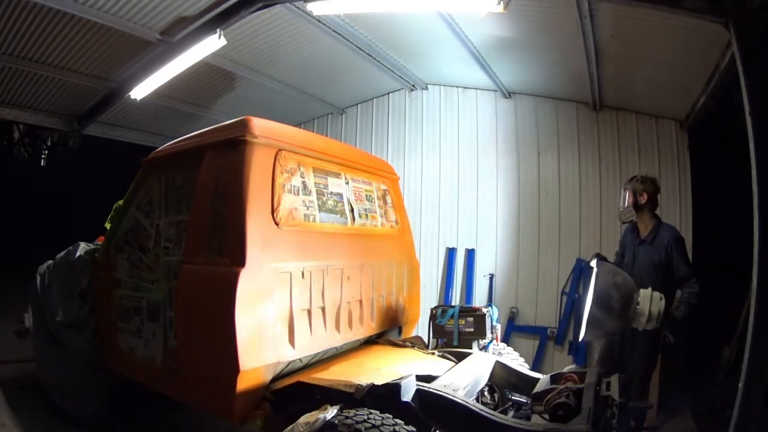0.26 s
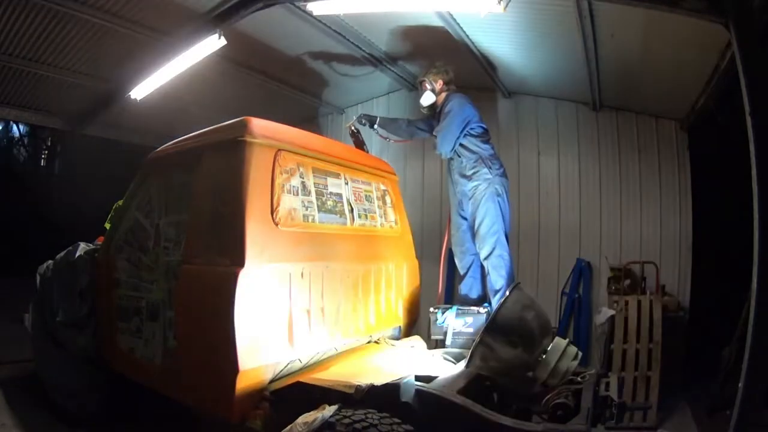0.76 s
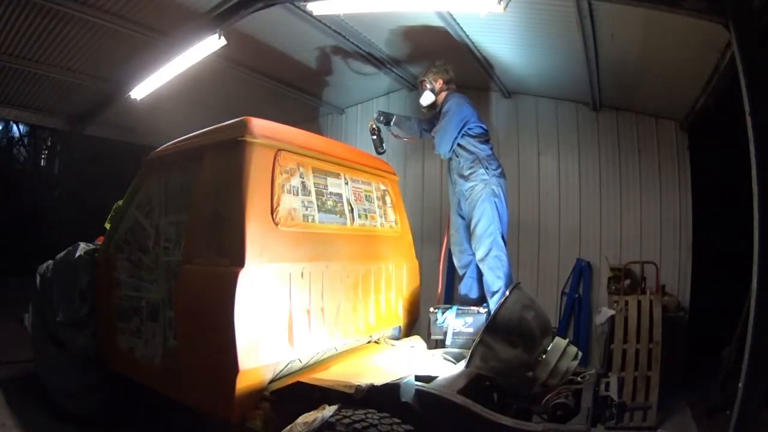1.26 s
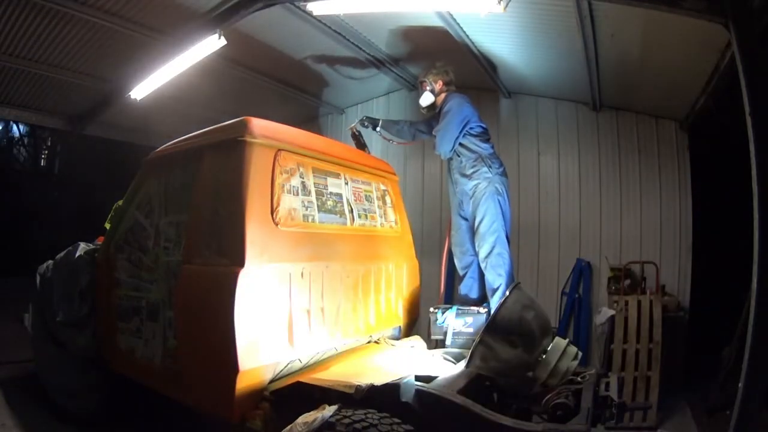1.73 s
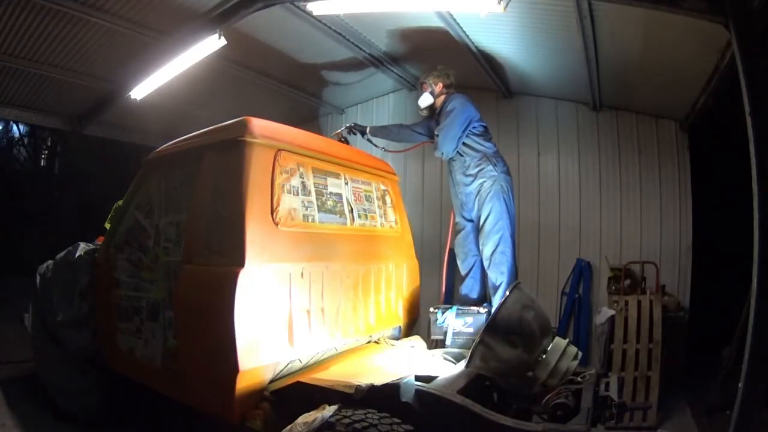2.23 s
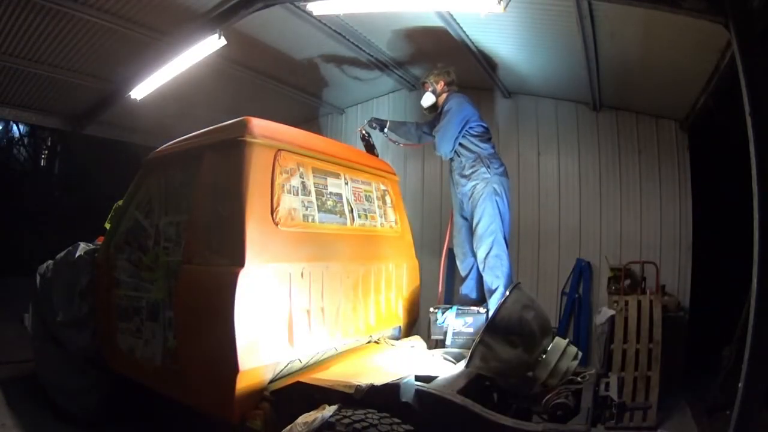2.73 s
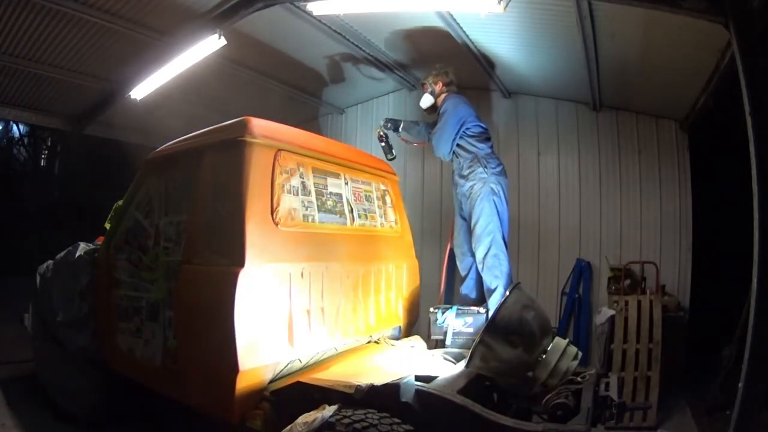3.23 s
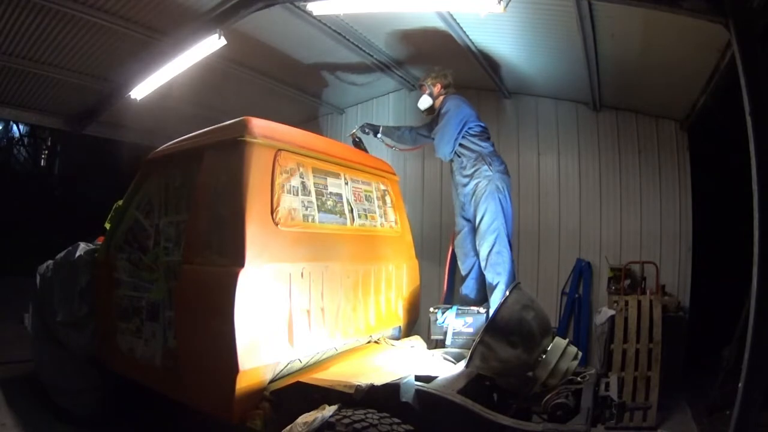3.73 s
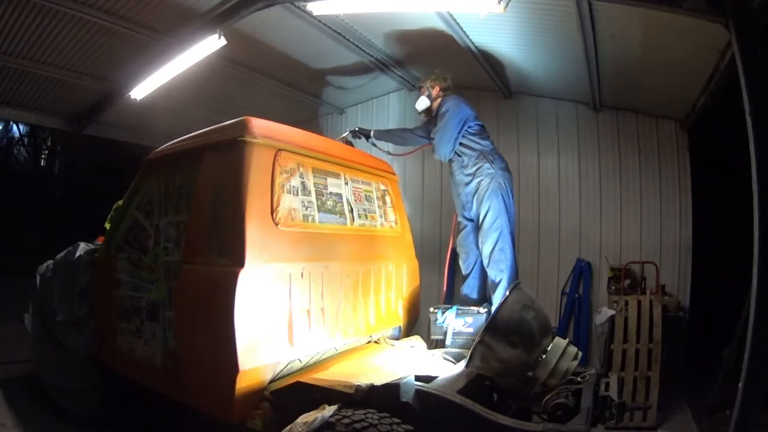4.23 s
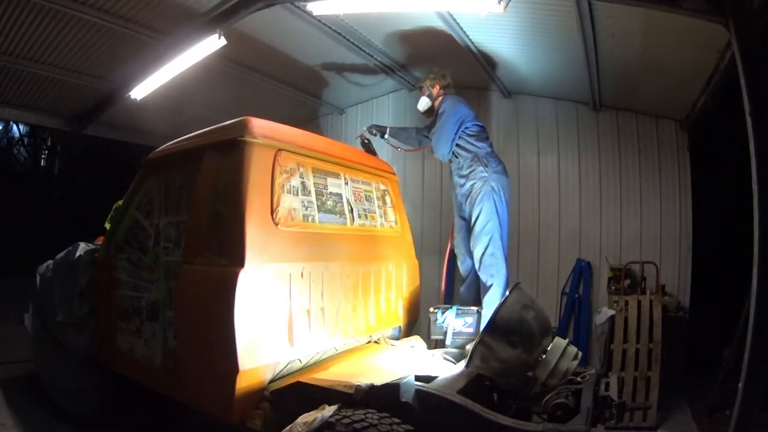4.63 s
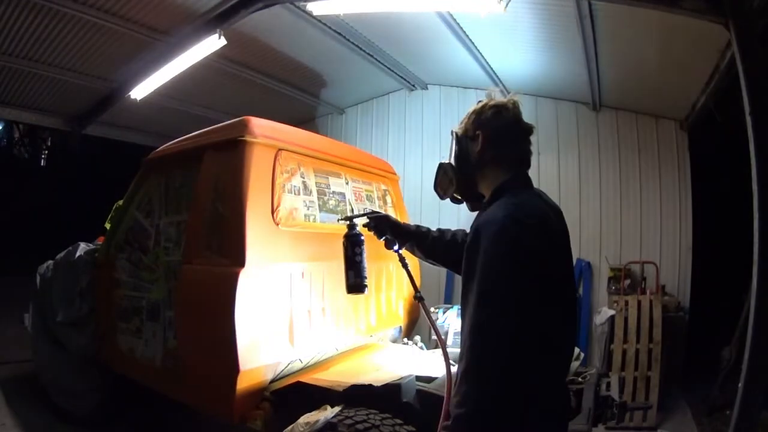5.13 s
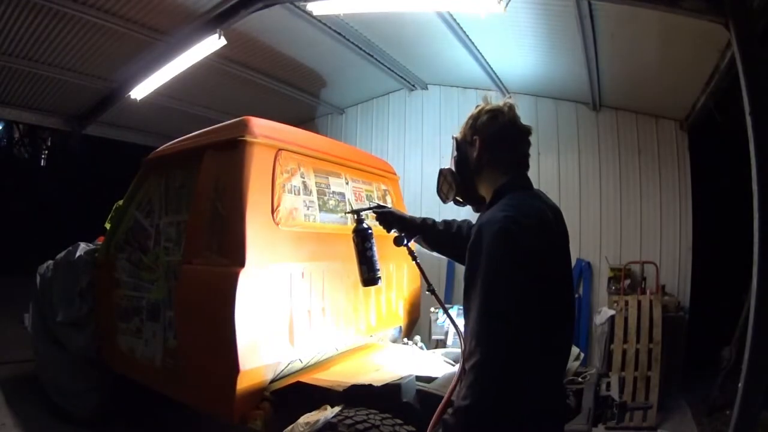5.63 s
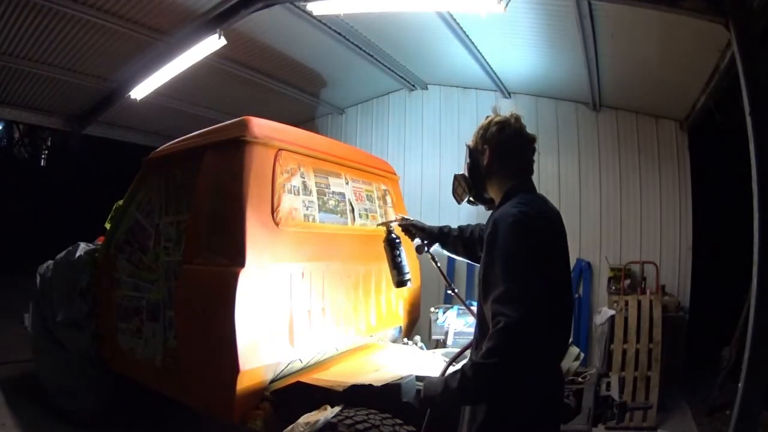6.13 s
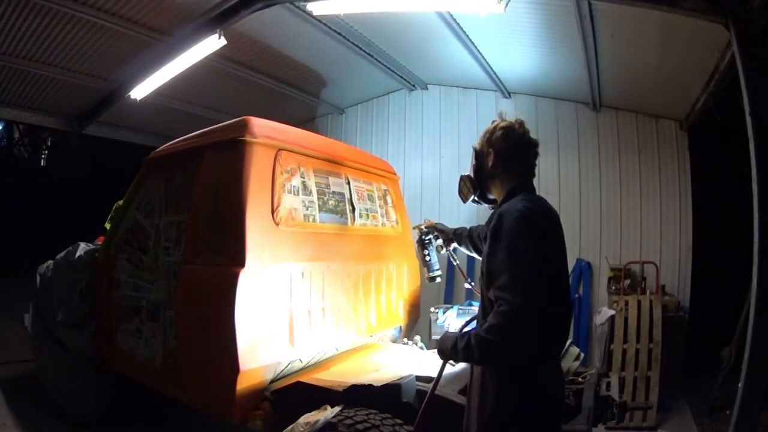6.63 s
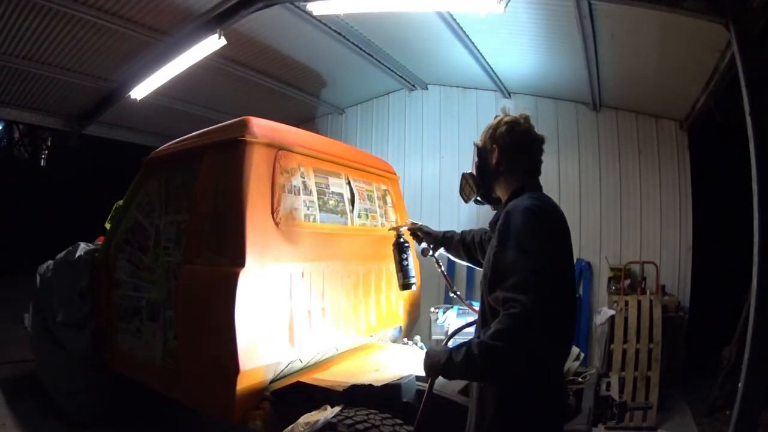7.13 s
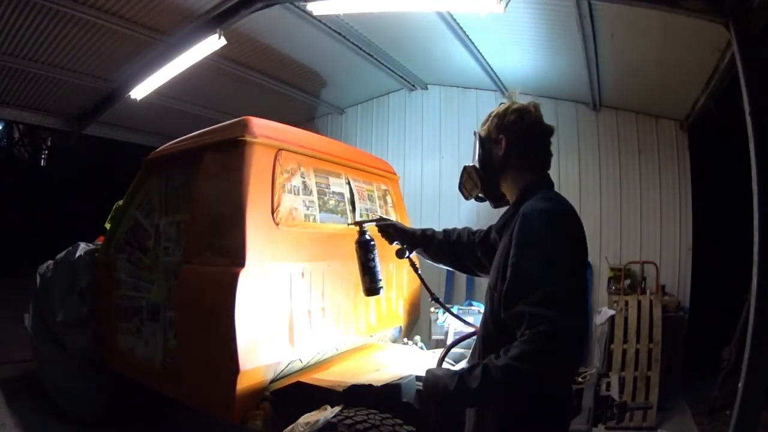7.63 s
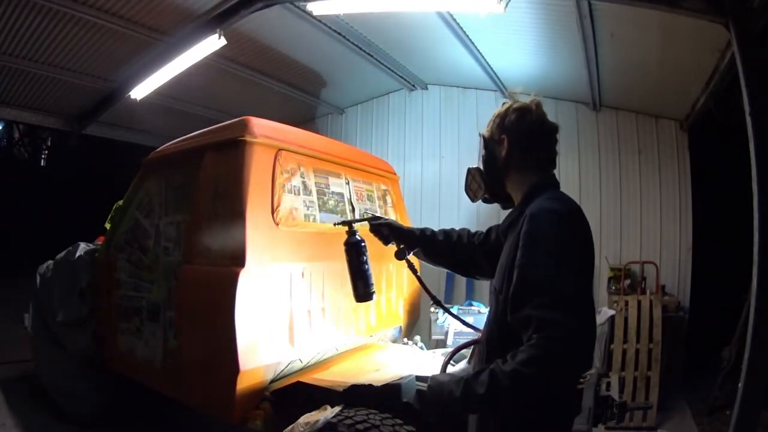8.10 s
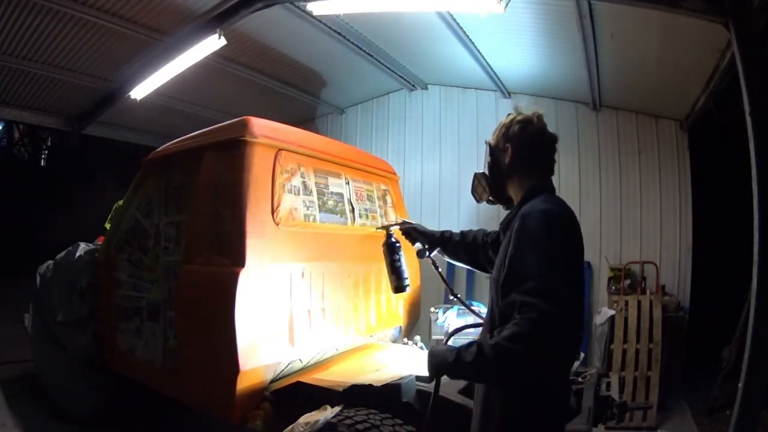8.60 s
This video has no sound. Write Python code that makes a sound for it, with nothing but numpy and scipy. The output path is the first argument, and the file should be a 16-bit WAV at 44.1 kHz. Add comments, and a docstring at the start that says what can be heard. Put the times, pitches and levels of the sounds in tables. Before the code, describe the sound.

Repeated long hisses of a paint spray gun ring briefly in a sheet-metal shed, over quiet night crickets and low air.

```python
"""A sheet-metal shed at night: an air spray gun coats a van, five passes over the roof, three along the rear.
The nozzle hisses and the jet roars on the bodywork. Echoes off the nearby metal sweep a comb through
the hiss as the gun moves, and the shed rings briefly after each pass. Crickets trill outside over low
night air and a far engine; there is a clink, a scuff and a soft bump. The sound drops out briefly twice."""
import sys
import numpy as np
from scipy import signal
from scipy.fft import rfft, irfft, next_fast_len
from scipy.io import wavfile
from scipy.ndimage import uniform_filter1d

SR = 44100
rng = np.random.default_rng(int(sys.argv[2]) if len(sys.argv) > 2 else 0)


def int16_out(signal):
    """Quantize to a 16-bit WAV file."""
    q = np.round(np.clip(np.atleast_2d(signal).T, -1, 1) * 32767)
    wavfile.write(sys.argv[1], SR, q.astype(np.int16))


N = 390726
TIME = np.arange(N) / SR

# one trigger pull per pass: pulled_s, released_s, hose_surge_db, hiss_db
PULLS = [(0.681, 1.132, 1, -18), (1.296, 2.111, 4, -18.5), (2.26, 3.028, -1, -18.5), (3.224, 4.053, 1, -18),
         (4.229, 4.989, 0, -18), (5.402, 6.553, 4, -17.5), (6.697, 7.816, 3.5, -17.5),
         (8.04, 8.895, 1.5, -18)]
# two short silences: start_s, end_s, fade_in_s
DROPOUTS = [(0.611, 0.684, 0.0027), (5.051, 5.114, 0.02)]


def spray_gun(roof_roar_db, rear_roar_db, sizzle_db, sputter_db, flutter_db):
    """The nozzle hisses and sizzles, unevenly as the coating tears into drops; the jet roars on the van."""
    # the nozzle's hiss and its finest, highest sizzle: freq_hz, level_db
    hiss_spectrum = [(900, -49), (1800, -19.5), (2600, -13), (3400, -8), (4200, -5), (5200, -1.73),
                     (6200, 0), (7200, -1.5), (8500, -3.5), (11200, -9.5)]
    sizzle_spectrum = [(4000, -35.5), (7000, -19), (8500, -7), (10000, 0.5), (11200, -1)]
    # the jet striking the roof and the rear panel: freq_hz, level_db
    roof_spectrum = [(60, -30.5), (150, -30), (280, -7), (520, -7.5), (730, -1), (950, -3), (1600, 3.5),
                     (2400, 1.5), (4000, -20), (9000, -33)]
    rear_spectrum = [(60, -29), (150, -22), (310, -15.5), (430, -5.5), (600, -8), (1000, -1.5), (1600, 0.5),
                     (2400, 0), (4000, -8.5), (9000, -41)]
    pulled, released, _, hiss_db = latest_pull()
    leave_roof_s = DROPOUTS[1][0]
    on_roof = TIME < leave_roof_s
    on_rear = TIME > pulled[pulled > leave_roof_s].min()
    # the wrist turns the nozzle: mid-pass the hiss thins and the sizzle brightens
    turn = np.sin(np.pi * progress(pulled, released))
    hiss = noise(hiss_spectrum) * undb(hiss_db - 0.27 * turn + flutter_db * walk(12))
    sizzle = noise(sizzle_spectrum) * undb(sizzle_db + 2 * turn + flutter_db * walk(24))
    roof_roar = noise(roof_spectrum) * undb(roof_roar_db)
    rear_roar = noise(rear_spectrum) * undb(rear_roar_db)
    roar = np.where(on_roof, roof_roar, rear_roar) * undb(1.17 * walk(60))
    jet = (hiss + sizzle) * undb(sputter_db * walk(400)) + roar
    jet = jet * valve(open_s=0.017, bleed_s=0.025, surge_s=0.031)
    jet = shed(jet, t60=0.345, wet_db=-4.5, hold_s=.12)
    return near_echoes(jet) * (on_roof | on_rear)


def valve(open_s, bleed_s, surge_s):
    """Air flow jumps up with a surge of stored hose pressure and bleeds away on release."""
    pulled, released, surge_db, _ = latest_pull()
    age = np.maximum(TIME - pulled, 0)
    opening = np.minimum(age / open_s, 1) * undb(surge_db * np.exp(-age / surge_s))
    return opening * np.exp(-np.maximum(TIME - released, 0) / bleed_s)


def latest_pull():
    """The current pass's row of PULLS at every moment, one signal per column."""
    columns = np.transpose(PULLS)
    return columns[:, np.maximum(np.searchsorted(columns[0], TIME) - 1, 0)]


def near_echoes(jet):
    """Panel, roof and wall mirror the hiss; their changing delays sweep combs through it."""
    # small metal sheets mirror only short waves: freq_hz, gain_db
    mirror_eq = [(500, -17), (2000, -9), (4000, -1), (6000, 1.5), (11000, 1)]
    bright = colour(jet, mirror_eq)
    paths = echo_paths()
    sways_ms = (.006, .035, .025)  # panel, roof, wall
    echoes = sum(echo(bright, *path, sway) for path, sway in zip(paths, sways_ms))
    # the echoes share the power of the jet
    share = np.sqrt(1 + sum(undb(db) ** 2 for _, db in paths))
    return (jet + echoes) / share


def echo_paths():
    """Delay (ms) and level (dB) of the panel, roof and wall echoes as the gun travels."""
    # echo off the roof sheet: time_s, delay_ms, level_db
    roof_echo = [(0.7, 2.73, -13), (4.9, 2.6, -18), (8.86, 2.7, -24)]
    # even sweeps along the rear panel, place 0 at its right edge and 1 at its left:
    # from_place, to_place, right_edge_delay_ms, delay_bend_exponent
    rear_sweeps = [(1, 0, 1.055, 2), (0, .92, 1.115, 4.4), (1.03, .2, 1.13, 2.75)]
    # panel and wall echoes stand still while the gun is over the roof
    panel_ms, panel_db = np.full(N, 1.3), np.full(N, -21.5)
    wall_ms, wall_db = np.full(N, 4.1), np.full(N, -23.0)
    rear_pulls = PULLS[-len(rear_sweeps):]
    for (pulled, released, *_), (start, end, edge_ms, bend) in zip(rear_pulls, rear_sweeps):
        now = TIME >= pulled
        place = start + (end - start) * progress(pulled, released)[now]
        panel_ms[now], panel_db[now] = edge_ms + .825 * place ** bend, -9.7 - 3.5 * place
        wall_ms[now], wall_db[now] = 3.85 + 1.4 * place, -14.2
    return (panel_ms, panel_db), curves(roof_echo), (wall_ms, wall_db)


def echo(x, delay_ms, db, sway_ms):
    """One reflection; the unsteady hand sways its delay."""
    late = TIME - (delay_ms + sway_ms * walk(5)) / 1000
    return undb(db) * np.array([np.interp(late, TIME, channel) for channel in x])


def shed(x, t60, wet_db, hold_s):
    """Dry sound plus the dense ring between steel walls; its pattern shifts every hold_s as things move."""
    hop, t = int(hold_s * SR), TIME[:int(t60 * SR)]
    decay = np.exp(-np.log(1000) * t / t60) * (t > .003)
    ring = np.zeros((2, N))
    for centre in range(0, N + hop, hop):
        a, b = max(centre - hop, 0), min(centre + hop, N)
        piece = x[:, a:b] * np.cos(np.pi / 2 * (np.arange(a, b) - centre) / hop)
        tail = rng.standard_normal((2, len(t))) * decay / np.linalg.norm(decay)
        answer = signal.fftconvolve(piece, tail, axes=1)[:, :N - a]
        ring[:, a:a + answer.shape[1]] += answer
    return (x + undb(wet_db) * ring) / np.hypot(1, undb(wet_db))


def crickets(level_db, drift_db_per_s, octave_db, third_db):
    """Each wing stroke rings the wing at its own pitch, with faint overtones; the shed blurs the trills."""
    # one cricket per row: pitch_hz, strokes_per_s, relative_db
    singers = [(1897, 65, -1.5), (1918, 74, 2.5), (1982, 72, -8), (2034, 80, 2.5), (2076, 69, 1.5),
               (2143, 60, -7.5)]
    # swells of the whole chorus: crest_s, rise_and_fall_s, boost_db
    swells = [(0.07, 0.11, 7.5), (0.38, 0.25, 4.5), (1.25, 0.08, 4.5), (2.22, 0.1, 2.5), (4.19, 0.12, 4),
              (5.29, 0.2, 7.5), (7.98, 0.12, 4)]
    chorus = np.zeros((2, N))
    for hz, stroke_rate, db in singers:
        stroke = 2 * np.pi * np.cumsum(stroke_rate * (1 + 0.0835 * walk(20))) / SR
        # the pitch bends a little within each stroke
        phase = 2 * np.pi * np.cumsum(hz * (1 + .011 * walk(40) + 0.012 * np.sin(stroke))) / SR
        wing = np.sin(phase) + undb(octave_db) * np.sin(2 * phase) + undb(third_db) * np.sin(3 * phase)
        rasp_db = 4.2 * walk(450)  # the teeth of the wing's file catch unevenly
        chorus += wing * (1 + np.cos(stroke)) * undb(db + rasp_db + 1.65 * walk(15))
    blurred = unit(shed(chorus, t60=0.31, wet_db=11, hold_s=.15))
    swell_db = sum(db * np.maximum(1 - np.abs(TIME - at) / rise_s, 0) for at, rise_s, db in swells)
    return blurred * undb(level_db + drift_db_per_s * TIME + swell_db)


def small_contacts():
    """A thin clink, a dry scuff and a soft, low bump."""
    # the tone of each contact: freq_hz, level_db
    clink_spectrum = [(5000, -48), (6700, -14), (7100, 0), (7500, -8), (8000, -25), (10000, -43)]
    scuff_spectrum = [(500, 0), (1500, -4), (2500, 7), (4000, 4), (5500, -7), (8000, -4), (11000, -19)]
    bump_spectrum = [(40, -18), (105, 0), (140, -12), (195, -0.5), (300, -15), (700, -20),
                     (3000, -35.5), (10000, -39)]
    clink = touch(clink_spectrum, at_s=0.004, db=-57, t60=.3)
    scuff = touch(scuff_spectrum, at_s=0.536, db=-47.4, t60=0.55)
    bump = touch(bump_spectrum, at_s=5.16, db=-46.5, t60=1.2)
    return clink + scuff + bump


def touch(spectrum, at_s, db, t60):
    """A brief contact: a noise burst with a 3 ms attack that dies away in the shed."""
    age = np.maximum(TIME - at_s, 0)
    return noise(spectrum) * undb(db - 60 * age / t60) * np.minimum(age / .003, 1)


def night_air(air_db, rumble_db, rumble_db_per_s):
    """A low, steady bed of air, with a deeper rumble that fades and stops at the first dropout."""
    # the air and the rumble under it: freq_hz, level_db
    air_spectrum = [(20, -28), (45, -4), (72, -1.5), (120, -2), (195, 0.5), (290, -1.5), (450, -4.5),
                    (800, -8), (1500, -12.5), (3000, -18.5), (5000, -28.5), (11000, -31.5)]
    rumble_spectrum = [(18, -15), (30, 1), (80, 0), (160, -6), (300, -18), (700, -51), (2000, -64)]
    air = noise(air_spectrum) * undb(air_db + 0.6 * walk(5.4))
    rumble = noise(rumble_spectrum) * undb(rumble_db + rumble_db_per_s * TIME + 2 * walk(12))
    return air + rumble * (TIME < DROPOUTS[0][0])


def far_engine(waver_db, throttle_s):
    """Only the firing note carries this far, climbing in each gear, rough and wavering on the way."""
    # one pull per gear: start_s, end_s, start_pitch_hz, climb_hz_per_s, level_db
    gears = [(1.03, 1.22, 199, 5, -57.5), (1.52, 2.08, 182, 66, -57), (2.24, 2.7, 177, 32, -59)]
    hz, gain = np.full(N, float(gears[0][2])), np.zeros(N)
    for start, end, start_hz, climb, db in gears:
        climbing_hz = start_hz + climb * (np.clip(TIME, start, end) - start)
        hz = np.where(TIME > start - throttle_s, climbing_hz, hz)
        gain += undb(db) * (progress(start - throttle_s, start) - progress(end, end + throttle_s))
    phase = 2 * np.pi * np.cumsum(hz * (1 + .055 * walk(70))) / SR
    note = np.sqrt(2) * np.sin(phase) * gain * undb(waver_db * walk(40))
    return np.array([note, note])


def undb(db):
    """Decibels to gain."""
    return np.exp(np.asarray(db) * (np.log(10) / 20))


def unit(x):
    """Scale to rms 1."""
    return x / np.sqrt(np.mean(x ** 2))


def progress(start, end):
    """An even ramp from 0 at the start to 1 at the end."""
    return np.clip((TIME - start) / (end - start), 0, 1)


def curves(rows):
    """Straight-line envelopes from rows of time_s and values, one per value column."""
    times, *columns = np.transpose(rows)
    return [np.interp(TIME, times, column) for column in columns]


def colour(x, points):
    """Equalise along a curve of (freq_hz, gain_db) points."""
    hz, db = np.transpose(points)
    size = next_fast_len(N + SR // 10)
    bins_hz = np.maximum(np.arange(size // 2 + 1) * SR / size, 1)
    gain = undb(np.interp(np.log(bins_hz), np.log(hz), db))
    return irfft(rfft(x, size) * gain, size)[..., :N]


def noise(spectrum):
    """Two unrelated noises of one colour, mid and side, at rms 1."""
    return unit(colour(rng.standard_normal((2, N)), spectrum))


def walk(rate):
    """Smooth random drift at rms 1, changing about rate times a second."""
    hold = max(int(SR / rate), 2)
    steps = np.repeat(rng.standard_normal(N // hold + 1), hold)
    return unit(uniform_filter1d(uniform_filter1d(steps, hold), hold)[:N])


def scene():
    """The gun in front of the night's small sounds, mixed as mid and side, then spread left and right."""
    # stereo width, widest in the midrange: freq_hz, side_gain_db
    width_eq = [(40, -14.5), (110, -14.5), (250, -6), (500, -2), (1000, -4), (2000, -7.5), (4000, -12),
                (8000, -16), (11000, -15.5)]
    contacts = small_contacts()
    gun = spray_gun(roof_roar_db=-40.5, rear_roar_db=-38, sizzle_db=-20.5, sputter_db=0.74, flutter_db=.5)
    insects = crickets(level_db=-46.2, drift_db_per_s=-0.5, octave_db=-30, third_db=-32)
    air = night_air(air_db=-52.5, rumble_db=-51, rumble_db_per_s=-5)
    engine = far_engine(waver_db=2.5, throttle_s=0.1)
    mid, side = gun + insects + contacts + air + engine
    side = colour(side, width_eq)
    return np.array([(mid + side) * undb(-0.11), (mid - side) * undb(0.1)])


def record(dry):
    """The sound falls silent at each dropout and fades back in; the top is cut steeply above 11 kHz."""
    gate = np.ones(N)
    for start, end, fade_s in DROPOUTS:
        gate *= np.where(TIME < start, 1, progress(end, end + fade_s))
    high_cut = [(11050, 0), (11300, -55), (13150, -90)]  # freq_hz, gain_db
    return colour(dry * uniform_filter1d(gate, size=88), high_cut)


dry = scene()
out = record(dry)
int16_out(out)
```